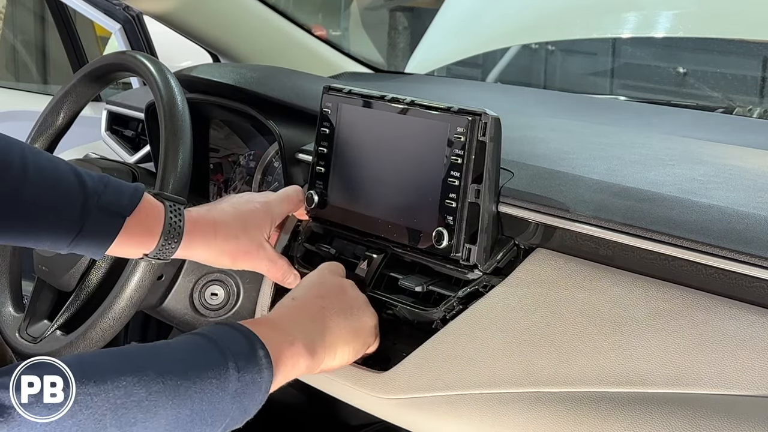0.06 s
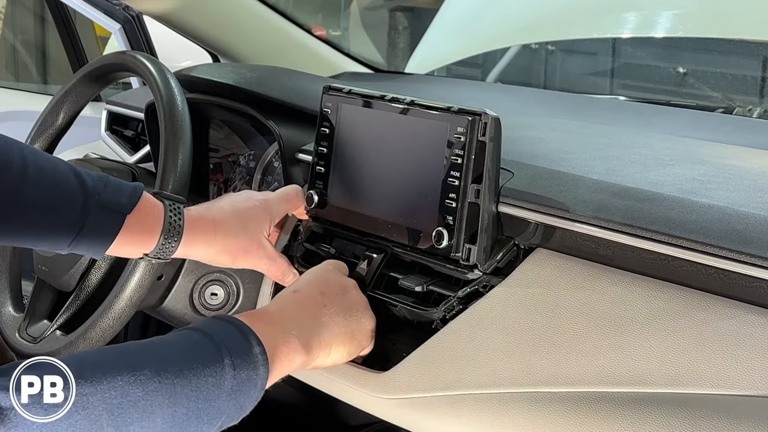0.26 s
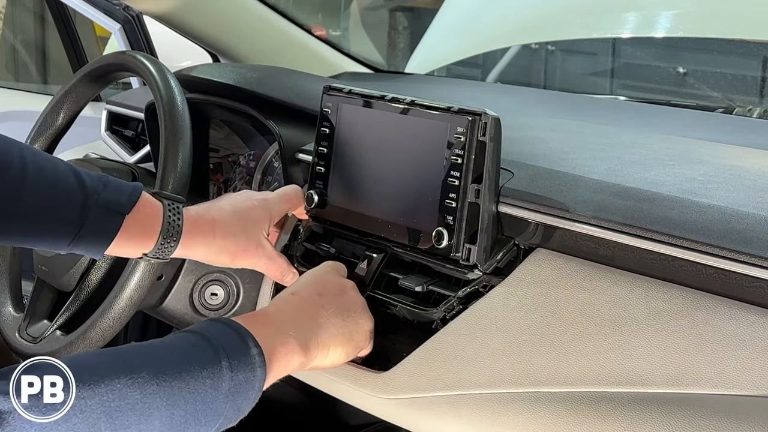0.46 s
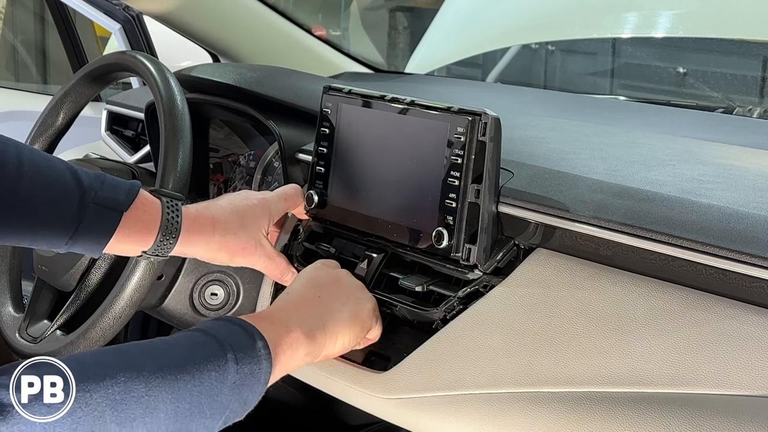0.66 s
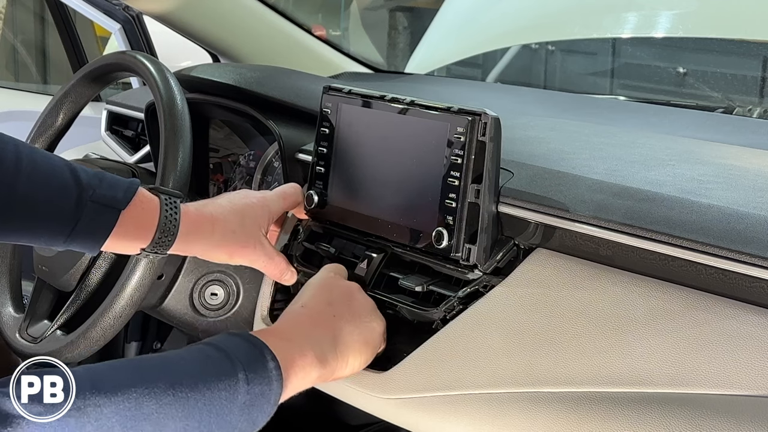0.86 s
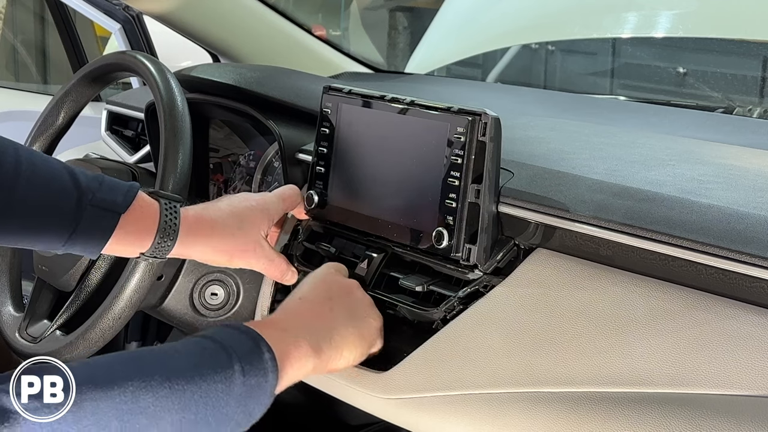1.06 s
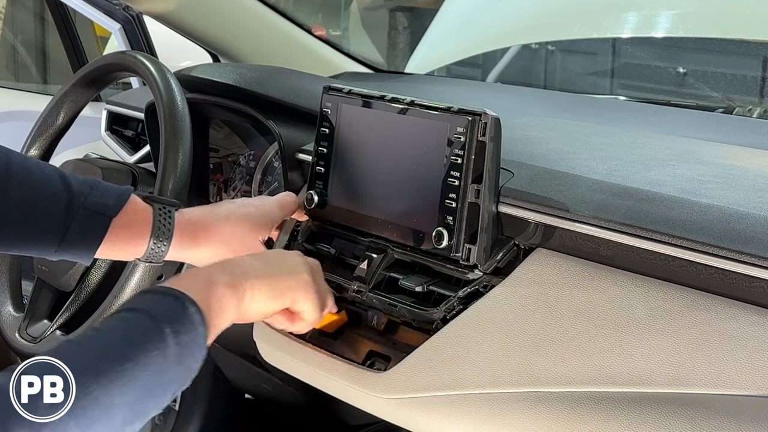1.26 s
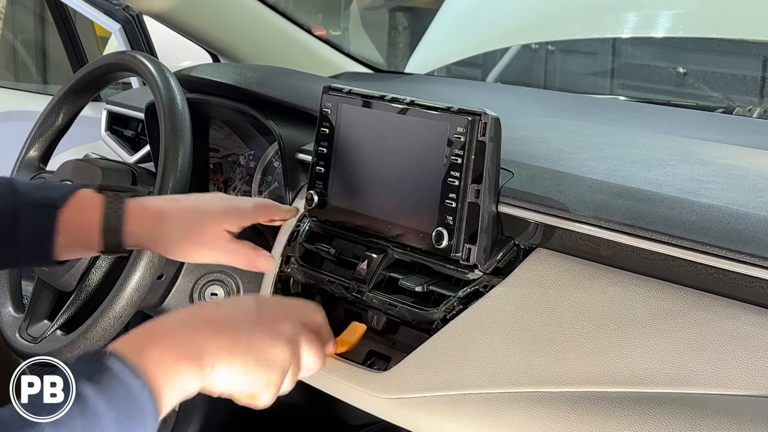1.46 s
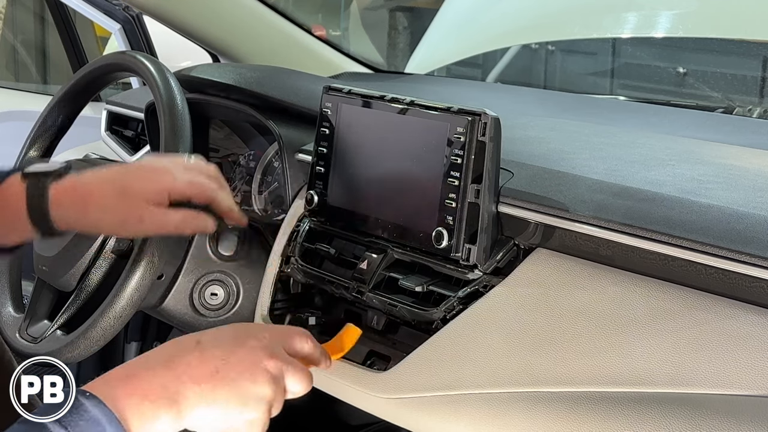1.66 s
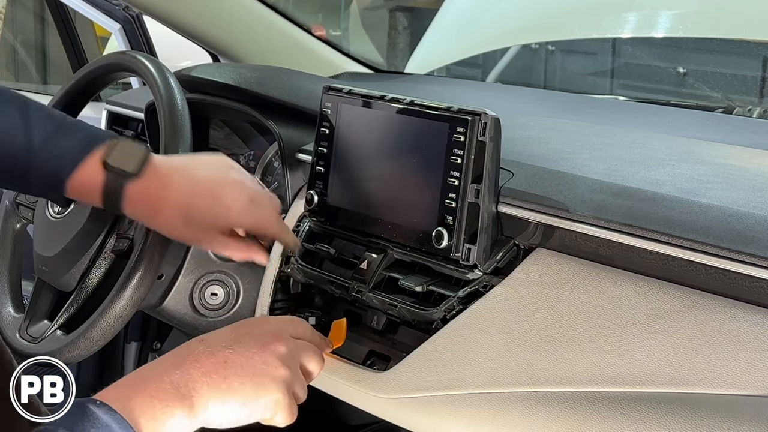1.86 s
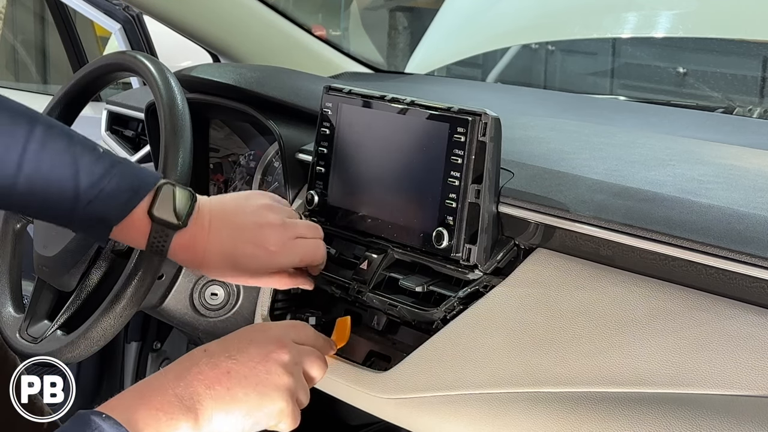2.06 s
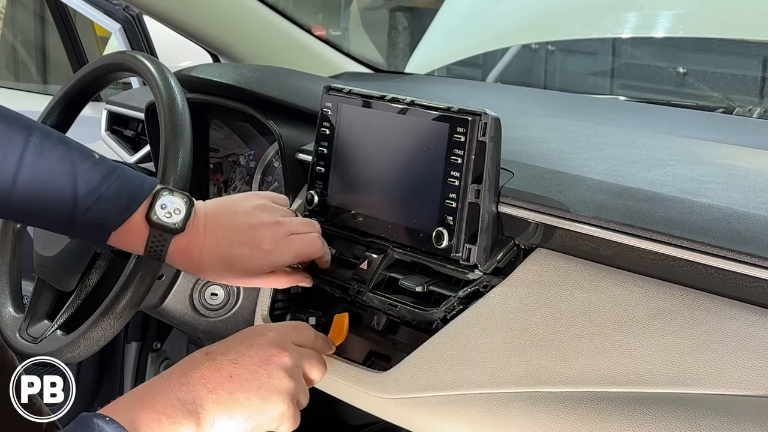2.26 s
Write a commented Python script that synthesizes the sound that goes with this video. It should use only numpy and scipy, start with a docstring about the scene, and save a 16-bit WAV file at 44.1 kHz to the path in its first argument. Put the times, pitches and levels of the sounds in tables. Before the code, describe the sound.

A plastic trim clip lets go with one loud, sharp crack, then the loose panel knocks and clicks, a pry tool scrapes out, duller knocks follow and sleeves rustle close to the microphone inside a parked car.

```python
"""Dull rubbing and a faint click, then a loud snap: a clip lets go as dashboard trim is levered off in a
parked car. Noise bursts make its crack and clatter, decaying sines the panel's ring and the cabin's boom.
Knocks and clicks follow; the pry tool scrapes out as random impulses and noise through resonances, and
sleeves rustle and tick near the microphone as filtered impulses. Decaying noise gives the cabin's brief
echoes and the workshop's faint tail, over quiet rumble and swaying air."""
import sys
import numpy as np
from scipy import signal
from scipy.fft import rfft, irfft, next_fast_len
from scipy.io import wavfile

SR = 44100
rng = np.random.default_rng(int(sys.argv[2]) if len(sys.argv) > 2 else 0)


def to_wav(sig):
    """Store sig (one row per channel, or 1-D mono) as 16-bit WAV at the path in sys.argv[1].

    Samples outside -1..1 are clipped; the rate is SR.
    """
    pcm = np.clip(np.atleast_2d(sig), -1, 1) * 32767
    pcm = np.round(pcm).astype(np.int16)
    wavfile.write(sys.argv[1], SR, pcm.T)  # frames by channels


N = 101429

# Colour tables are spectral shapes: their relative_db is scaled to unit RMS gain before use.
# Level curves are interpolated in dB between their points.

# The big snap
SNAP_S, SNAP_DB, SNAP_T60_S, SNAP_TILT_DB = 0.2207, -7, 0.027, 1.2  # tilt per octave
RECOIL_LAG_S, RECOIL_DB = 0.0022, 4.5
SNAP_CLATTER_DB, SNAP_CLATTER_T60_S, SNAP_CLATTER_TILT_DB = -21, 0.069, 4.5  # tilt per octave
# spectrum of the crack: frequency_hz, relative_db
SNAP_SPECTRUM = [(300, -11.5), (700, -3), (1030, -7), (1750, -6.5), (2020, -16), (2650, -7), (3100, -15),
                 (3450, -8), (3850, -27), (4250, -5), (4900, -20), (5800, -17.5), (6600, -7.5),
                 (7600, -13.5), (8400, -17.5), (11000, -20.5), (14500, -20.5), (16000, -34)]

# modes of the trim panel and the dash behind it: frequency_hz, relative_db, t60_s
PANEL_MODES = [(80.1, -27.5, 0.18), (122, -17.5, 0.11), (234.5, -26.5, 0.14), (315, -25, 0.16),
               (370, -17.5, 0.078), (420, -23.5, 0.079), (536, -23, 0.083), (635, -16, 0.032),
               (924.5, -19.5, 0.049), (1047, -16.5, 0.05), (1191, -30, 0.079), (1480, -20.5, 0.056),
               (1820, -24, 0.033)]
PANEL_RISE_S, PANEL_PIVOT_HZ = 0.0026, 390  # rise time constant; frequency the tilt leaves unchanged

# knocks of the loose panel: start_s, ring_db, ring_tilt_db_per_octave, clatter_db,
# clatter_tilt_db_per_octave, struck_spot_hz, struck_spot_db
PANEL_KNOCKS = [(0.4095, -28.5, -5.5, -29.5, 3.5, 460, -26.5), (0.4139, -35, -7, -39.5, -0.5, 980, -35),
                (0.424, -30, -10.5, -34.5, -0.5, 564, -39), (0.463, -40, -12.5, -60, 6, 139, -31),
                (0.621, -50, -10.5, -54.5, 1.5, 554, -52.5), (.747, -34, -6.5, -49, 0, 392.4, -46.5),
                (.803, -60, -3, -55, 2, 575, -45.5), (0.865, -56.5, -4, -51.5, 1.5, 600, -50.5),
                (1.008, -49, -10, -43, -2.5, 332, -37), (1.4412, -50, 0, -44, 3.5, 400, -48),
                (1.4463, -45, 8, -23, 1.5, 225, -23), (1.4513, -26.5, -7, -32.5, 0, 362, -24),
                (1.4565, -25.5, -8, -30.5, 2, 293, -26.5), (1.838, -54, -11, -42, 3, 475, -31.5),
                (1.857, -29, -4, -41, -0.5, 735, -38), (1.871, -33.5, -8, -41, 2, 990, -43),
                (1.88, -51, 4, -40.5, 1, 247, -42), (1.886, -39, -7.5, -45, 0, 177, -31),
                (2.111, -45, -12, -39.5, 1.5, 622, -37), (2.1123, -58, -5, -45, -0.5, 2530, -43)]
SPOT_T60_S, CLATTER_T60_S = 0.032, 0.05
# spectrum of the clatter: frequency_hz, relative_db
CLATTER_SPECTRUM = [(60, -13.5), (150, 13.5), (400, 6.5), (800, -3), (1400, -10), (2200, -21), (4500, -29),
                    (9000, -43), (16000, -45.5)]
# clicks of clips and tool on plastic: start_s, level_db, tilt_db_per_octave, t60_s
PLASTIC_CLICKS = [(0.127, -53, -8.5, .03), (0.4069, -36.5, -2.5, 0.012), (0.4095, -32.5, 4, 0.017),
                  (0.489, -43.5, 4.5, 0.043), (0.516, -59.5, 1, 0.069), (0.582, -51, 6.5, 0.031),
                  (0.629, -65.5, 4.5, 0.025), (0.675, -59, 2, 0.058), (0.745, -52, 6.5, 0.036),
                  (.8182, -39.5, -7.5, .006), (0.8638, -52.5, 0.5, 0.023), (1.016, -42.5, -1.5, 0.016),
                  (1.125, -53, 11, 0.019), (1.232, -47.5, 3, 0.014), (1.263, -41, -5.5, 0.036),
                  (1.394, -48.5, -4.5, 0.019), (1.418, -50.5, -2, 0.035), (1.4365, -54, -3, .01),
                  (1.4865, -48.5, -3.5, 0.01), (2.1111, -41, -3.5, 0.037), (2.115, -38.5, -3.5, 0.019),
                  (2.183, -58.5, -0.5, 0.026)]
# spectrum of the clicks: frequency_hz, relative_db
CLICK_SPECTRUM = [(200, -7.5), (1000, -2.5), (2000, 4.5), (3200, 5), (4800, 0), (6500, 2.5), (9000, -6.5),
                  (13000, -8.5), (16000, -16)]

# booms of the cabin air as the panel jumps: start_s, level_db (before the gradual rise)
CABIN_BOOMS = [(0.224, -40.5), (0.413, -48), (1.466, -20.5)]
BOOM_HZ, BOOM_T60_S, BOOM_RISE_S = 37.8, 0.32, 0.015

# the tool slides along the trim: time_s, level_db (before SLIDE_TRIM_DB and the surge)
SLIDE_LEVEL = [(.89, -82), (.92, -50), (.95, -58), (.965, -47), (.984, -43.5), (.995, -76), (1.05, -54.5),
               (1.1, -47), (1.13, -46.5), (1.2, -47), (1.25, -57.5), (1.275, -45), (1.39, -57.5),
               (1.42, -55), (1.47, -67)]
SLIDE_TRIM_DB = -9
SURGE_HZ, SURGE_DB = 30.3, 2.6  # uneven sticking and sliding: upper rate, RMS swing
# spectrum of the slide: frequency_hz, relative_db
SLIDE_SPECTRUM = [(470, -36), (800, -5.5), (1050, -23), (1150, -3), (1350, -11), (1500, -17), (1680, -13.5),
                  (2150, -10), (2500, -15.5), (4460, -12), (6650, -18.5), (7640, -18), (8340, -19),
                  (12900, -31), (16000, -49)]
# harder drags that rasp: centre_s, gaussian_half_length_s, level_db
RASP_DRAGS = [(0.971, 0.011, -48.5), (1.13, 0.011, -40.5), (1.188, 0.027, -52.5)]
# rasp resonances, pitched as at BLADE_MID_S: frequency_hz, width_hz, relative_db
RASP_RESONANCES = [(1168, 90, -3.5), (1493, 120, 2), (1870, 350, -3.5), (2440, 350, -5.5),
                   (3700, 1100, -9.5), (6080, 900, -9.5)]
# thin squeal of the blade: time_s, level_db
SQUEAL_LEVEL = [(.9, -79), (.93, -71), (.975, -59), (1, -80), (1.05, -58.5), (1.09, -61), (1.14, -72),
                (1.2, -67), (1.25, -85)]
# squeal resonances, pitched as at BLADE_MID_S: frequency_hz, width_hz, relative_db
SQUEAL_RESONANCES = [(5900, 150, -1), (6730, 160, 1), (7300, 170, -2), (8200, 200, -16), (9360, 400, -8),
                     (14200, 400, -12), (15700, 500, -9)]
BLADE_RISE_OCTAVES_PER_S, BLADE_MID_S, BLADE_HALF_SPAN_S = 0.67, 1.137, 0.3
# hollow resonance of the opening gap: time_s, pitch_hz, level_db
GAP_RESONANCE = [(1.1, 864, -63.5), (1.16, 698, -44.5), (1.2, 604, -44), (1.25, 530, -49.5),
                 (1.32, 424, -56), (1.41, 385, -58)]
GAP_WIDTH_HZ, GAP_OVERTONE_RATIO, GAP_OVERTONE_DB = 160, 2.28, -19
# creak of strained plastic, about the snap and as the hand grips again: time_s, level_db
CREAK_LEVEL = [(.11, -99), (.17, -70), (.21, -67.5), (.23, -86.5), (2.22, -90), (2.26, -71.5), (2.3, -65)]
# creak resonances: frequency_hz, width_hz, relative_db
CREAK_RESONANCES = [(400, 130, 2.5), (796, 300, -4.5), (1780, 240, -5.5), (2700, 350, -10),
                    (3800, 200, -16.5), (7800, 1200, -18)]

# dull rubbing of hands on the dash: time_s, level_db
HANDLING_LEVEL = [(0, -51.5), (.09, -63.5), (.19, -53), (.4, -55.5), (.47, -52), (.56, -59.5), (.72, -60),
                  (.78, -55), (.89, -60), (.94, -50), (1.04, -52), (1.07, -41.5), (1.22, -45.5),
                  (1.33, -44), (1.41, -57), (1.48, -48), (1.57, -58), (1.66, -45.5), (1.73, -55.5),
                  (1.82, -54.5), (1.87, -46), (1.95, -65), (2.08, -58), (2.14, -51.5), (2.22, -62.5),
                  (2.3, -66)]
# spectrum of the rubbing: frequency_hz, relative_db
HANDLING_SPECTRUM = [(30, -6), (70, -1), (130, 0), (220, -10.5), (400, -9.5), (700, -16), (1500, -24.5),
                     (5000, -42.5)]
# rumble of the moving panel in the dash: time_s, level_db
RUMBLE_LEVEL = [(.21, -65), (.25, -42), (.31, -36), (.37, -49), (.45, -39), (.55, -59.5), (.7, -60.5),
                (1.05, -53.5), (1.2, -44), (1.4, -43.5), (1.52, -38.5), (1.62, -40.5), (1.76, -53),
                (1.88, -40), (1.98, -57), (2.3, -61)]
# spectrum of the rumble: frequency_hz, relative_db
RUMBLE_SPECTRUM = [(25, -1), (42, 3.5), (75, -6), (110, -11.5), (160, -19.5), (300, -29.5)]

# a sleeve swishes as the arm draws back: time_s, level_db
SWISH_LEVEL = [(1.24, -87), (1.28, -57.5), (1.335, -55), (1.358, -59), (1.375, -83)]
# spectrum of the swish: frequency_hz, relative_db
SWISH_SPECTRUM = [(1000, -38), (4000, 0), (8500, 9), (12000, 3), (16000, -7)]
# cloth rustles as the hands move over: time_s, level_db (before RUSTLE_TRIM_DB)
RUSTLE_LEVEL = [(1.47, -59), (1.55, -59), (1.62, -56.5), (1.68, -51.5), (1.76, -55), (1.8, -51.5),
                (1.825, -69), (1.86, -61.5), (1.925, -56.5), (1.95, -79), (2.07, -68), (2.14, -62),
                (2.22, -79), (2.3, -63)]
RUSTLE_TRIM_DB = -3.5
# spectrum of the rustle: frequency_hz, relative_db
RUSTLE_SPECTRUM = [(290, -21), (500, -3.5), (795, -26), (1110, -25), (1280, -8.5), (2730, -12), (3650, -21),
                   (3920, -14), (12300, -27.5), (16000, -36)]
# fine crackle of a creasing sleeve: time_s, level_db
CRACKLE_LEVEL = [(1.6, -83), (1.69, -69), (1.76, -69), (1.81, -61), (1.86, -63)]
# dry ticks of cloth and plastic near the microphone: start_s, level_db, tilt_db_per_octave
CLOSE_TICKS = [(0.246, -23, 2), (0.4756, -33, -2), (.739, -40, -1), (0.818, -30.5, 4), (0.847, -43, 1),
               (0.9219, -30.5, -3.5), (0.945, -38, 4), (1.0084, -28.5, 1), (1.28, -33, -6),
               (1.577, -30.5, -2), (1.684, -31, -7), (1.697, -27.5, -3), (1.704, -28.5, 0.5),
               (1.716, -35, -3), (1.729, -28, -2), (1.729, -33, 5), (1.7443, -21.5, -1.5), (1.755, -34, 3),
               (1.758, -26.5, 2), (1.7618, -33, -0.5), (1.768, -29, -6), (1.7878, -32, -3),
               (1.7898, -30, -7), (1.8015, -22.5, -2), (1.808, -32, -6), (1.835, -29.5, -3),
               (1.923, -34, 0), (1.9252, -35, 8), (1.931, -38.5, 6)]
# spectrum of ticks and crackle: frequency_hz, relative_db
TICK_SPECTRUM = [(200, -13.5), (1500, -10), (2800, -6), (3900, 3.5), (5200, -3.5), (10000, -7.5),
                 (16000, -17)]

CABIN_DB, CABIN_T60_S, CABIN_RISE_S, CABIN_TOP_HZ = -27.5, 0.017, 0.0015, 9800
# bands of the workshop's tail: centre_hz, relative_db, t60_s
WORKSHOP_BANDS = [(202, -31, 0.47), (550, -40, 0.95), (1150, -35, 0.61), (2270, -34.5, 0.39),
                  (4500, -41, 0.36), (8000, -39.5, 0.35), (14000, -42, .26)]
WORKSHOP_DB, SNAP_TAIL_DB, WORKSHOP_RISE_S = -31, -9.5, 0.008

# spectrum of the workshop rumble: frequency_hz, relative_db
FLOOR_SPECTRUM = [(30, 4.5), (42, -10.5), (70, -8), (130, -16.5), (260, -28), (600, -25), (1200, -38.5),
                  (2500, -39), (6000, -43.5), (16000, -48)]
FLOOR_DB = -59
SWAY_HZ, SWAY_DB = 7.8, -37.5  # air sways against the microphone

CEILING, TOP_HZ = 0.86, 16200  # peak amplitude limit, upper band edge


def amp(db):
    """Logarithmic level: convert decibels to an amplitude ratio."""
    return 10 ** (np.asarray(db) / 20)


def unit(x):
    """Power normalization: scale to an RMS of one."""
    return x / np.sqrt(np.mean(x ** 2))


def clock():
    """Discrete time: the sample instants in seconds."""
    return np.arange(N) / SR


def fade(t60):
    """Exponential damping: a fall of 60 dB in t60 seconds."""
    return np.exp(-np.log(1000) * clock() / t60)


def rise(tau_s):
    """Gradual excitation: an exponential approach to full amplitude."""
    return 1 - np.exp(-clock() / tau_s)


def add(out, start_s, x):
    """Superposition: mix x in from a start time."""
    i = int(start_s * SR)
    out[i:i + len(x)] += x[:N - i]


def colour(x, points, tilt_db=0):
    """Minimum-phase filtering: shape x causally through spectrum points, tilted per octave."""
    size = next_fast_len(2 * len(x), real=True) // 2 * 2
    hz, db = np.array(points, float).T
    octave = np.log2(np.maximum(np.fft.rfftfreq(size, 1 / SR), 1))
    held = np.clip(octave, np.log2(hz[0]), np.log2(hz[-1]))
    shape_db = np.interp(octave, np.log2(hz), db) + tilt_db * held
    beyond_db = 10 * np.abs(octave - held)  # 10 dB per octave outside the points
    gain = amp(shape_db - beyond_db)
    # folding the cepstrum forward turns the gain into a causal response
    cepstrum = irfft(np.log(unit(gain)))
    cepstrum[1:size // 2] *= 2
    cepstrum[size // 2 + 1:] = 0
    return irfft(rfft(x, size) * np.exp(rfft(cepstrum)))[:len(x)]


def lowpass(x, hz, order=2):
    """Butterworth filtering: attenuate frequencies above the cutoff."""
    return signal.sosfilt(signal.butter(order, hz, fs=SR, output="sos"), x)


def burst(points, t60, tilt_db=0):
    """Impulsive excitation: decaying random-sign noise stands for a crowd of short plastic resonances."""
    count = N // 12
    crowd = np.sign(rng.standard_normal(count)) * fade(t60)[:count]
    return np.pad(colour(crowd, points, tilt_db), (0, N - count))


def curve(rows):
    """Amplitude envelope: gain along the level points, falling 1000 dB per second outside them."""
    s, db = np.array(rows, float).T
    t = clock()
    outside_s = np.abs(t - np.clip(t, s.min(), s.max()))
    return amp(np.interp(t, s, db) - 1000 * outside_s)


def grit(rate, spread_db):
    """Stick-slip friction: random impulses of uneven size, at a mean rate per second."""
    slips = rng.random(N) < rate / SR
    strength = rng.standard_normal(N)
    unevenness = amp(spread_db * np.minimum(rng.exponential(size=N), 4))
    return unit(slips * strength * unevenness)


def resonate(x, modes):
    """Resonance: x drives a parallel set of fixed peaks."""
    rings = 0
    for hz, width_hz, db in modes:
        b, a = signal.iirpeak(hz, hz / width_hz, fs=SR)
        rings = rings + amp(db) * signal.lfilter(b, a, x)
    return unit(rings)


def glide(x, hz, width_hz):
    """Heterodyne filtering: shift x down, narrow it and shift it back, for a moving resonance."""
    turn = np.exp(2j * np.pi * np.cumsum(hz) / SR)
    return unit((lowpass(x / turn, width_hz / 2) * turn).real)


def panel(tilt_db):
    """Modal vibration: the panel's damped sines, tilted in dB per octave about a pivot."""
    t = clock()
    ring = np.zeros(N)
    for k, (hz, db, t60) in enumerate(PANEL_MODES):
        level_db = db + tilt_db * np.log2(hz / PANEL_PIVOT_HZ)
        ring += (-1) ** k * amp(level_db) * fade(t60) * np.sin(2 * np.pi * hz * t)
    ring *= rise(PANEL_RISE_S)
    ring[N // 4:] = 0
    return ring


def snap():
    out = np.zeros(N)
    crack = burst(SNAP_SPECTRUM, SNAP_T60_S, SNAP_TILT_DB)
    clatter = burst(CLATTER_SPECTRUM, SNAP_CLATTER_T60_S, SNAP_CLATTER_TILT_DB)
    add(out, SNAP_S, amp(SNAP_DB) * crack)
    add(out, SNAP_S + RECOIL_LAG_S, amp(RECOIL_DB) * panel(0) + amp(SNAP_CLATTER_DB) * clatter)
    return out


def impacts():
    """Impact excitation: knocks ring panel, struck spot and clatter; clicks are short bursts."""
    out = np.zeros(N)
    for s, ring_db, ring_tilt_db, clatter_db, clatter_tilt_db, spot_hz, spot_db in PANEL_KNOCKS:
        spot = amp(spot_db) * np.sin(2 * np.pi * spot_hz * clock()) * fade(SPOT_T60_S)
        ring = amp(ring_db) * panel(ring_tilt_db)
        clatter = amp(clatter_db) * burst(CLATTER_SPECTRUM, CLATTER_T60_S, clatter_tilt_db)
        add(out, s, spot + ring + clatter)
    for s, db, tilt_db, t60 in PLASTIC_CLICKS:
        add(out, s, amp(db) * burst(CLICK_SPECTRUM, t60, tilt_db))
    return out


def booms():
    """Cavity resonance: the lowest mode of the cabin air swells and decays."""
    out = np.zeros(N)
    boom = np.sin(2 * np.pi * BOOM_HZ * clock()) * fade(BOOM_T60_S) * rise(BOOM_RISE_S)
    for s, db in CABIN_BOOMS:
        add(out, s, amp(db) * boom)
    return out


def blade(x, modes):
    """Shortening resonator: the modes rise in pitch as the blade slides out, held outside its span."""
    slide_s = np.clip(clock() - BLADE_MID_S, -BLADE_HALF_SPAN_S, BLADE_HALF_SPAN_S)
    stretch = 2 ** (BLADE_RISE_OCTAVES_PER_S * slide_s)
    return unit(sum(amp(db) * glide(x, hz * stretch, width_hz) for hz, width_hz, db in modes))


def slide():
    """Friction noise: impulses of the dragged tool surge as it sticks and slides unevenly."""
    surge = amp(SURGE_DB * unit(lowpass(rng.standard_normal(N), SURGE_HZ)))
    friction = colour(grit(rate=7700, spread_db=4.0), SLIDE_SPECTRUM)
    return surge * amp(SLIDE_TRIM_DB) * curve(SLIDE_LEVEL) * friction


def rasp():
    """Friction-driven resonance: harder drags excite the blade's modes with coarse impulses."""
    t = clock()
    pressure = sum(amp(db) * np.exp(-.5 * ((t - s) / half_s) ** 2) for s, half_s, db in RASP_DRAGS)
    return pressure * blade(grit(rate=2800, spread_db=3.0), RASP_RESONANCES)


def squeal():
    """Narrow-band resonance: noise excites the blade's high modes."""
    return curve(SQUEAL_LEVEL) * blade(rng.standard_normal(N), SQUEAL_RESONANCES)


def gap():
    """Cavity resonance: rubbing noise rings the widening gap and its overtone ever lower."""
    s, hz, db = np.array(GAP_RESONANCE).T
    pitch_hz = np.interp(clock(), s, hz)
    rub = rng.standard_normal(N)
    hollow = glide(rub, pitch_hz, GAP_WIDTH_HZ)
    overtone = glide(rub, GAP_OVERTONE_RATIO * pitch_hz, 2 * GAP_WIDTH_HZ)
    return curve(np.c_[s, db]) * (hollow + amp(GAP_OVERTONE_DB) * overtone)


def creak():
    """Stick-slip resonance: random slips ring the modes of strained plastic."""
    return curve(CREAK_LEVEL) * resonate(grit(rate=2400, spread_db=2.0), CREAK_RESONANCES)


def handling():
    """Surface friction: hands rub as dull impulses while the shifting panel rumbles as low noise."""
    rub = colour(grit(rate=4900, spread_db=-0.07), HANDLING_SPECTRUM)
    rumble = colour(rng.standard_normal(N), RUMBLE_SPECTRUM)
    return curve(HANDLING_LEVEL) * rub + curve(RUMBLE_LEVEL) * rumble


def sleeves():
    """Granular friction: impulse streams swish, rustle and crackle, with single ticks close by."""
    out = curve(SWISH_LEVEL) * colour(grit(rate=8300, spread_db=-2.0), SWISH_SPECTRUM)
    rustle = colour(grit(rate=4500, spread_db=1.7), RUSTLE_SPECTRUM)
    out += amp(RUSTLE_TRIM_DB) * curve(RUSTLE_LEVEL) * rustle
    out += curve(CRACKLE_LEVEL) * colour(grit(rate=520, spread_db=3.5), TICK_SPECTRUM)
    for s, db, tilt_db in CLOSE_TICKS:
        add(out, s, amp(db) * colour(signal.unit_impulse(N // 12), TICK_SPECTRUM, tilt_db))
    return out


def cabin(x):
    """Early reflection: convolution with brief decaying noise stands for echoes off glass and dash."""
    onset = 1 - np.exp(-(clock() / CABIN_RISE_S) ** 2)
    echoes = lowpass(rng.standard_normal(N), CABIN_TOP_HZ, order=1) * fade(CABIN_T60_S) * onset
    response = unit(echoes) / np.sqrt(N)  # unit energy
    return amp(CABIN_DB) * signal.fftconvolve(x, response)[:N]


def workshop_tail():
    """Diffuse reverberation: overlapping bands of noise, each with its own decay."""
    octave = np.log2(np.maximum(np.fft.rfftfreq(N, 1 / SR), 1))
    centres = np.log2([row[0] for row in WORKSHOP_BANDS])
    noise = rfft(rng.standard_normal(N))
    out = np.zeros(N)
    for share, (_, db, t60) in zip(np.eye(len(WORKSHOP_BANDS)), WORKSHOP_BANDS):
        # each band overlaps its neighbours in a triangle over octaves
        band = unit(irfft(noise * np.interp(octave, centres, share), N))
        out += amp(db) * fade(t60) * band
    return out * rise(WORKSHOP_RISE_S)


def workshop(x):
    """Room response: the snap adds a tail of its own and convolution lets smaller sounds stir it faintly."""
    out = amp(WORKSHOP_DB) * signal.fftconvolve(x, workshop_tail())[:N]
    add(out, SNAP_S, amp(SNAP_TAIL_DB) * workshop_tail())
    return out


def background():
    """Stationary noise: quiet workshop rumble and a slow sway of air."""
    rumble = colour(rng.standard_normal(N), FLOOR_SPECTRUM)
    sway = unit(lowpass(rng.standard_normal(N), SWAY_HZ, order=3))
    return amp(FLOOR_DB) * rumble + amp(SWAY_DB) * sway


def scene():
    """Superposition: direct sources, their reflections and the background add linearly."""
    pop = snap()
    scraping = slide() + rasp() + squeal() + gap() + creak()
    trim = impacts() + scraping + handling()
    rooms = cabin(pop + trim) + workshop(trim) + booms()
    return (pop + trim + rooms + sleeves() + background())[None]


def record(dry):
    """Saturation and band-limiting: the recorder rounds off loud peaks and cuts the top."""
    rounded = dry / (1 + (dry / CEILING) ** 4) ** (1 / 4)
    return signal.sosfilt(signal.ellip(8, .2, 70, TOP_HZ, fs=SR, output="sos"), rounded)


dry = scene()
out = record(dry)
to_wav(out)
```